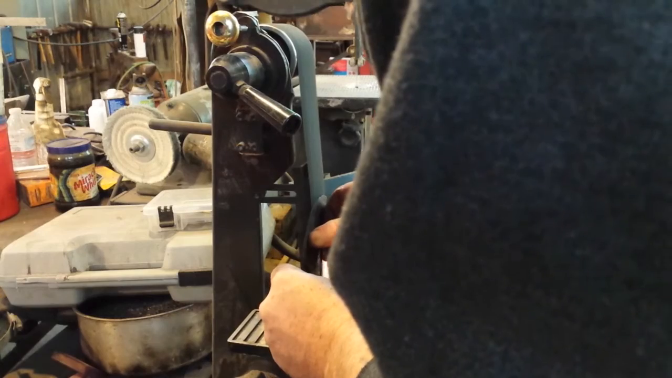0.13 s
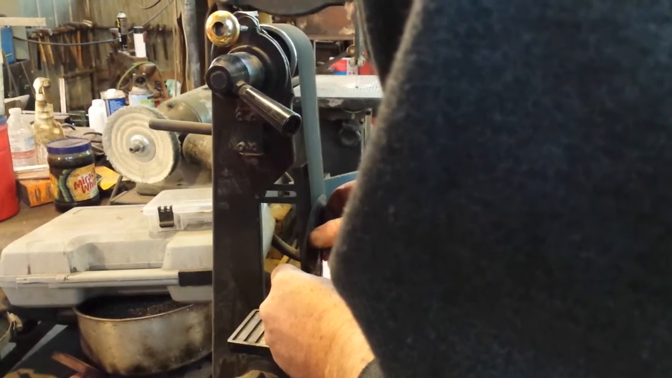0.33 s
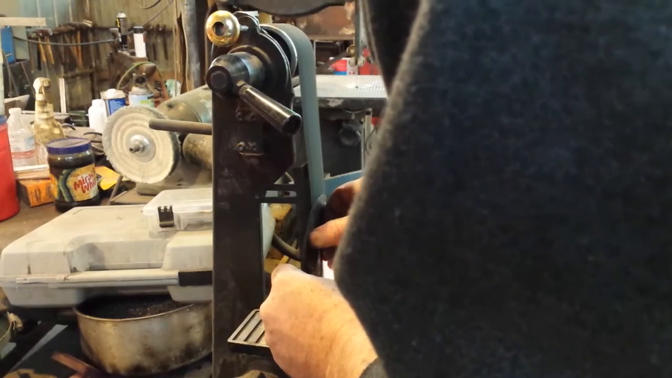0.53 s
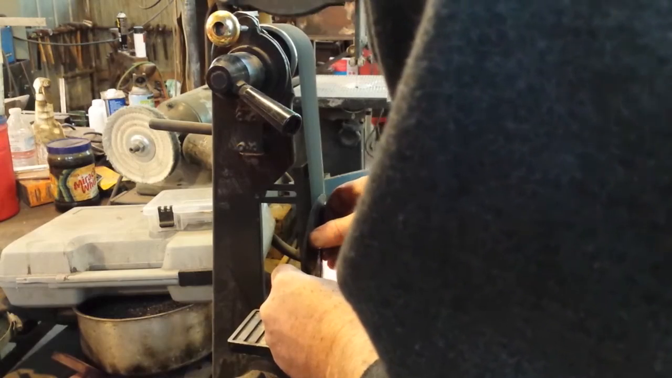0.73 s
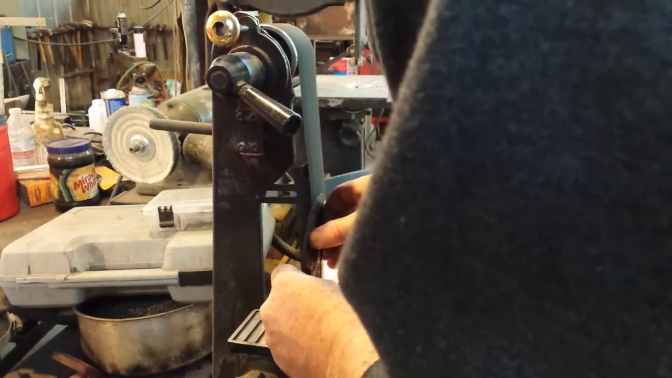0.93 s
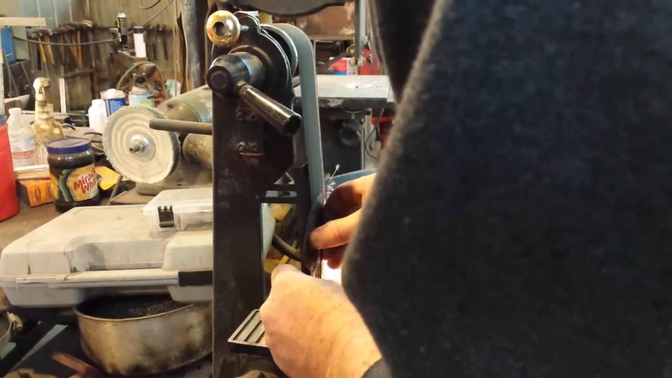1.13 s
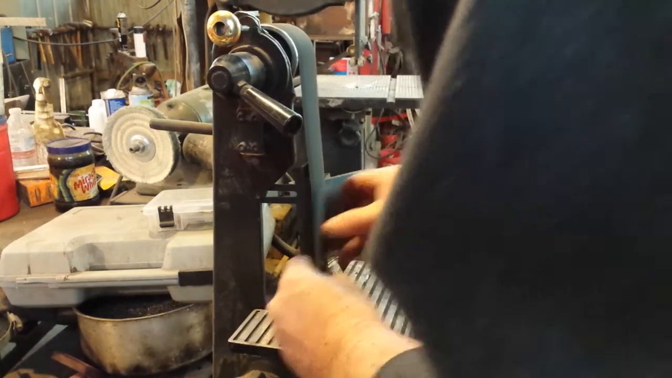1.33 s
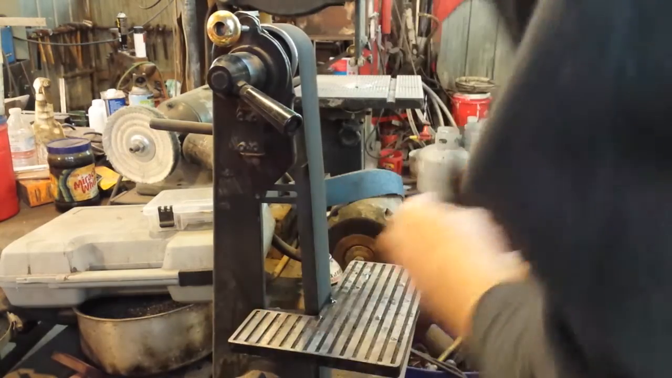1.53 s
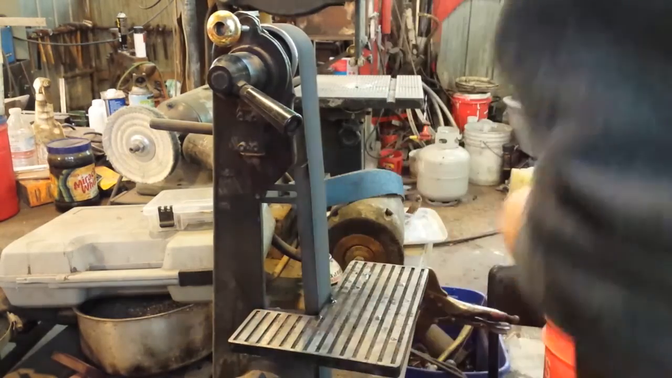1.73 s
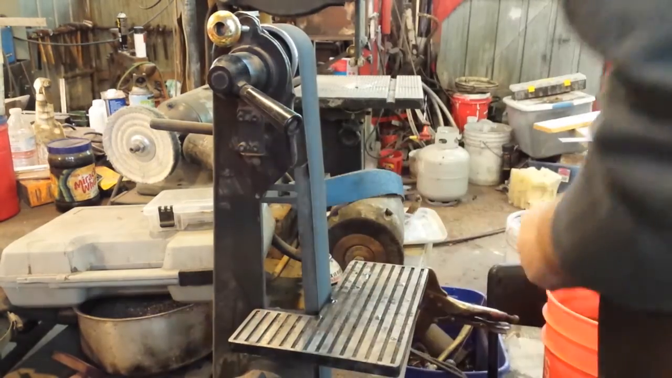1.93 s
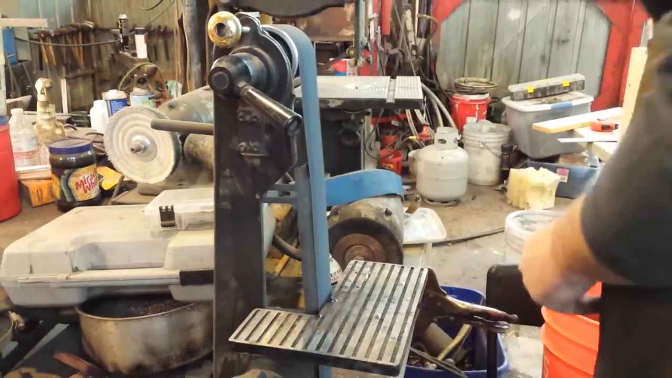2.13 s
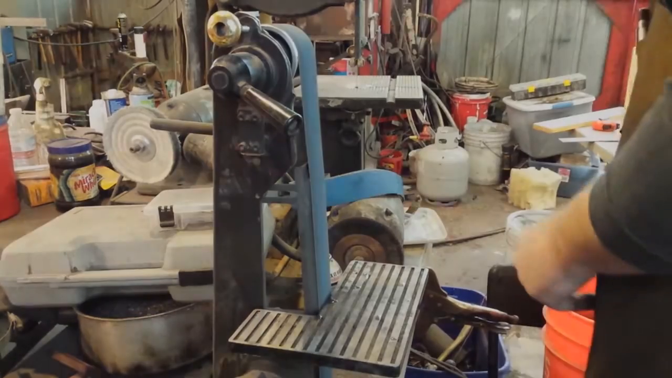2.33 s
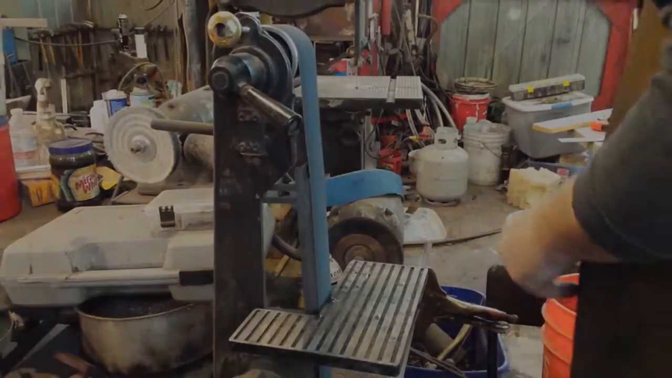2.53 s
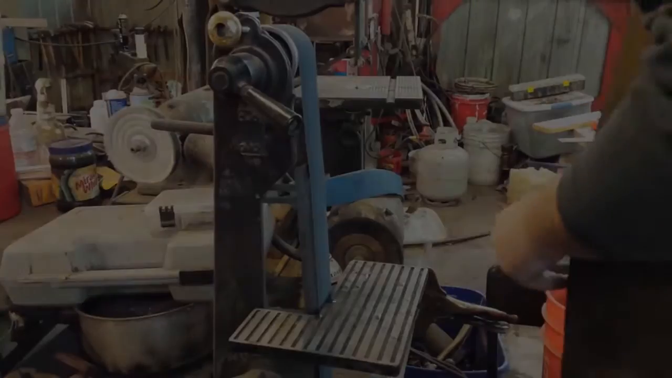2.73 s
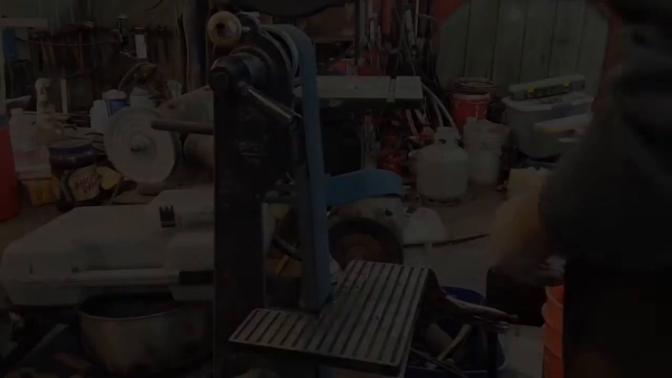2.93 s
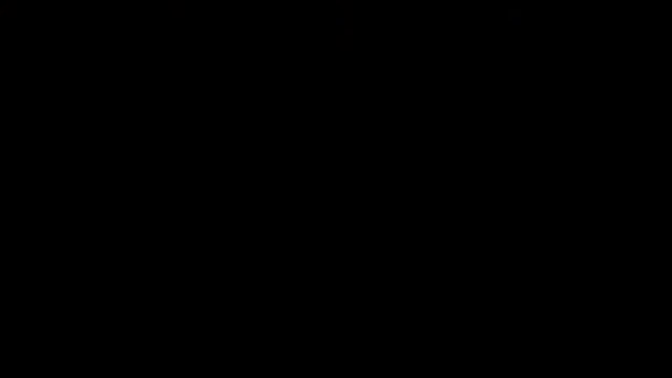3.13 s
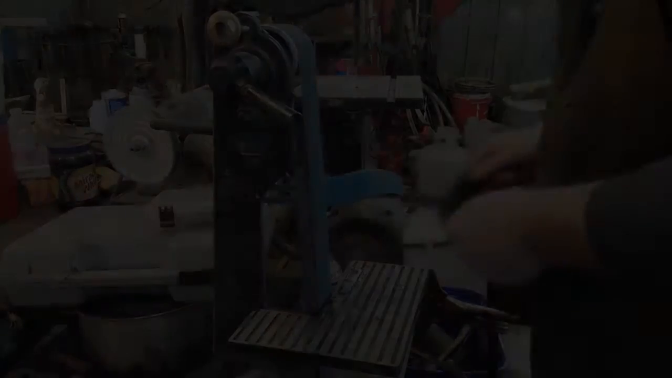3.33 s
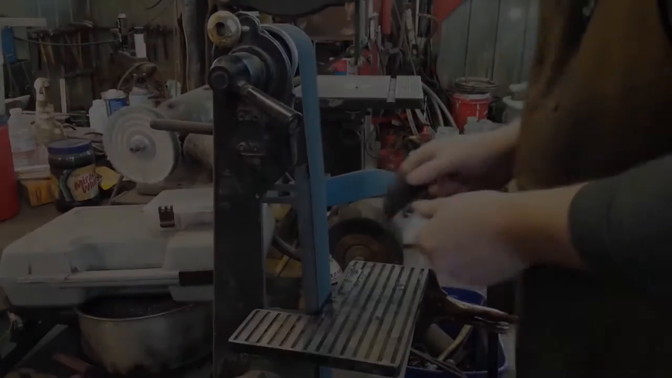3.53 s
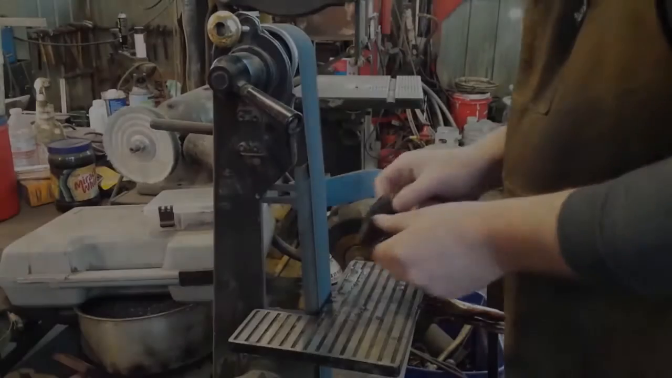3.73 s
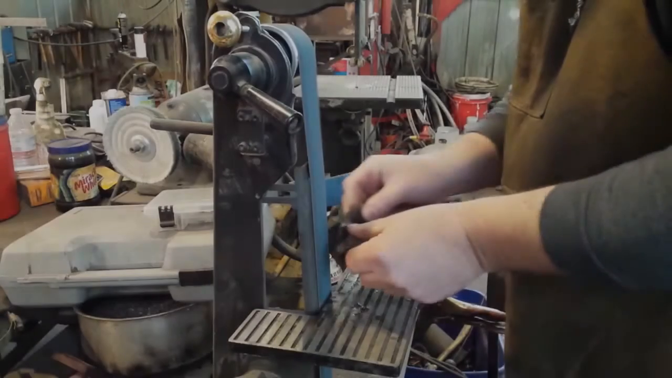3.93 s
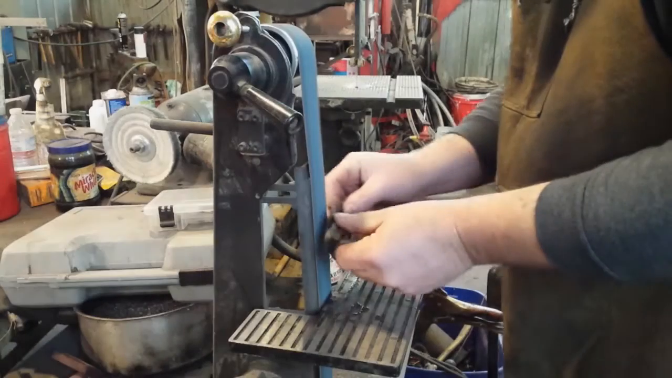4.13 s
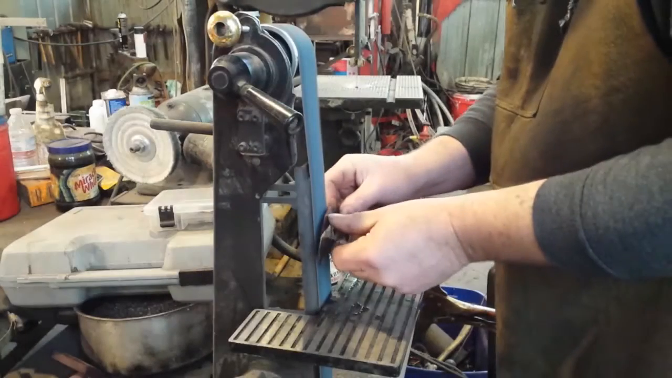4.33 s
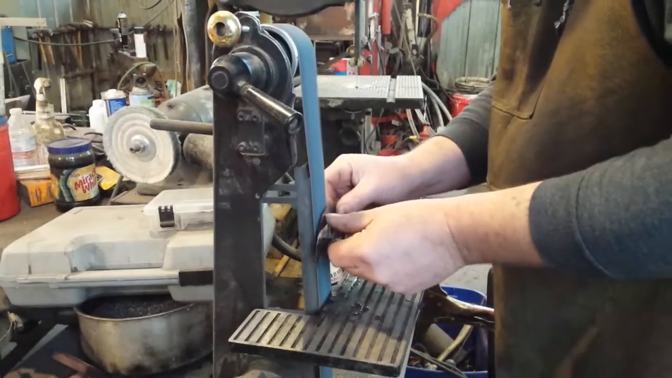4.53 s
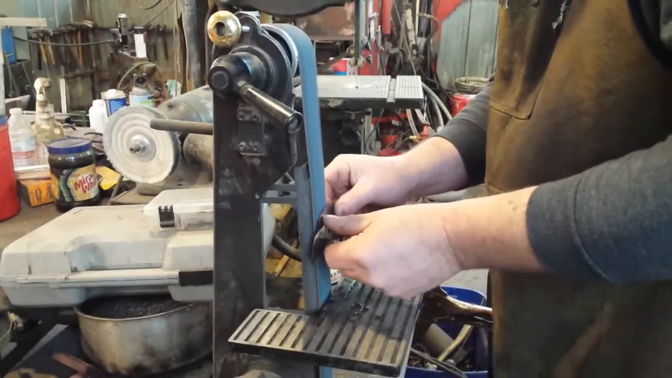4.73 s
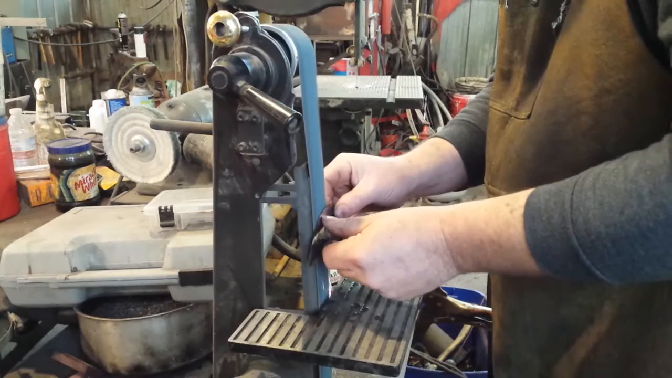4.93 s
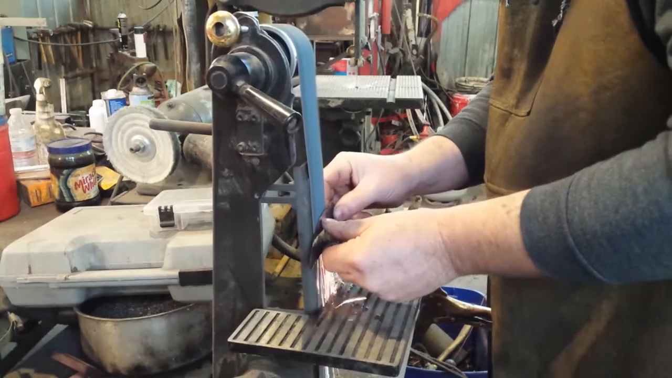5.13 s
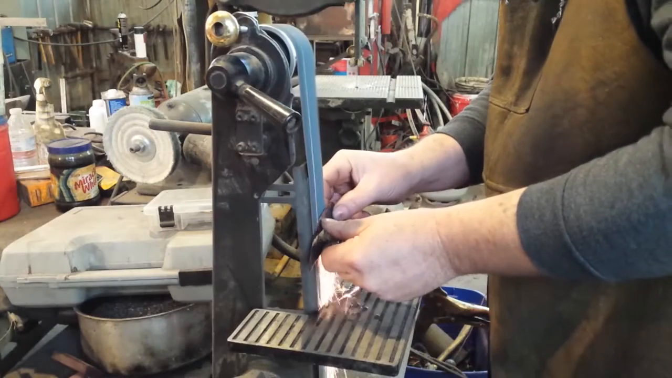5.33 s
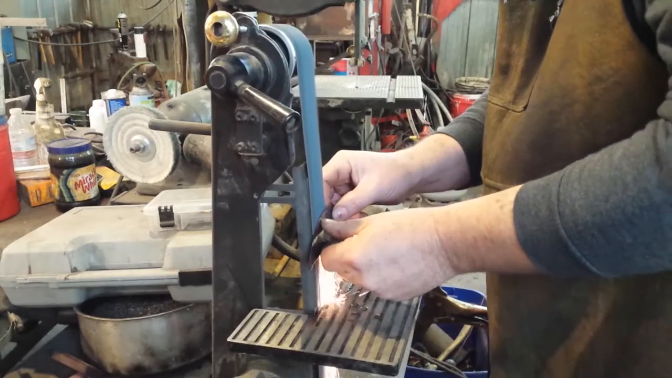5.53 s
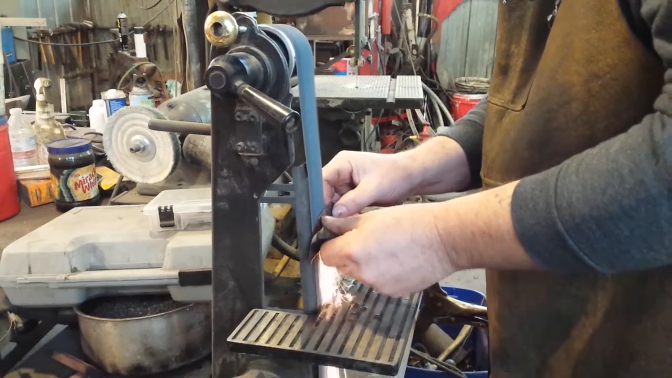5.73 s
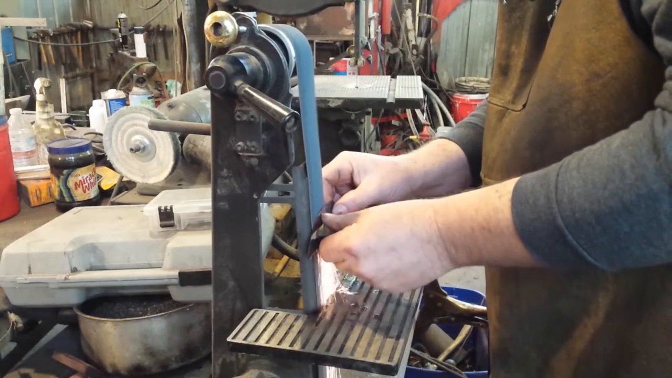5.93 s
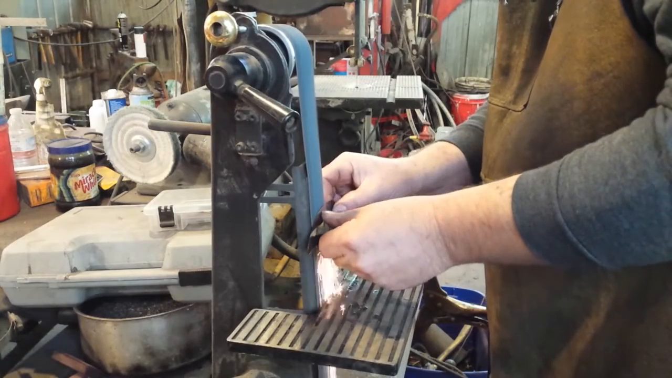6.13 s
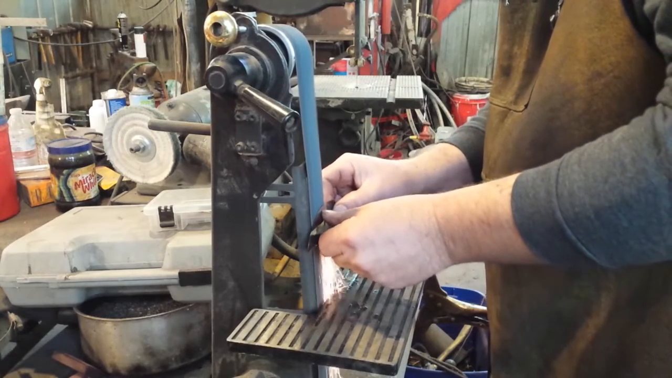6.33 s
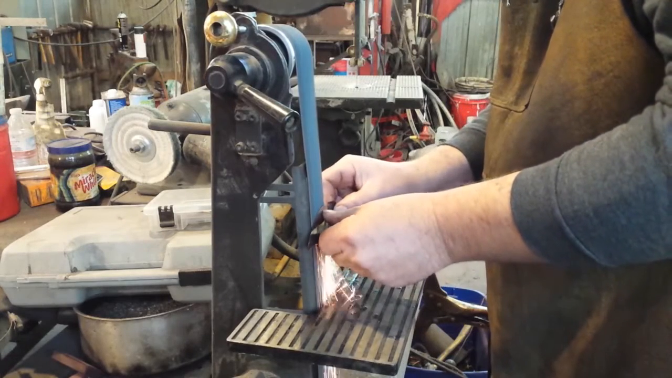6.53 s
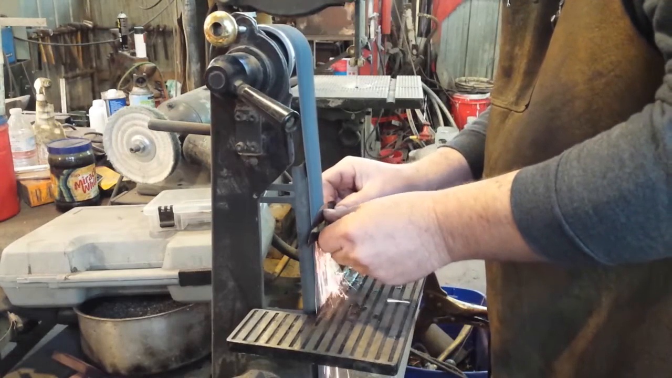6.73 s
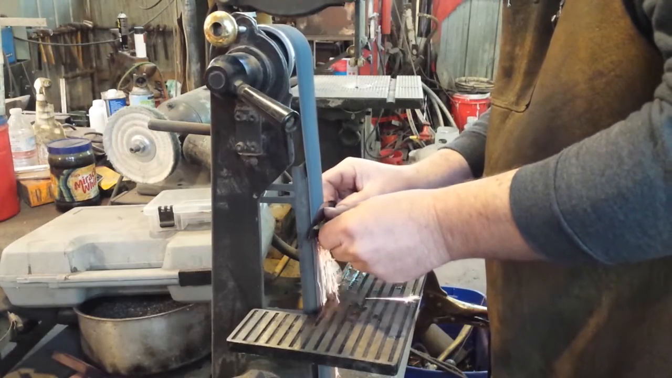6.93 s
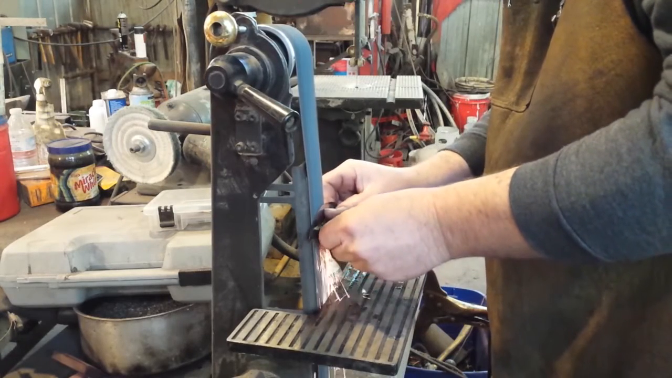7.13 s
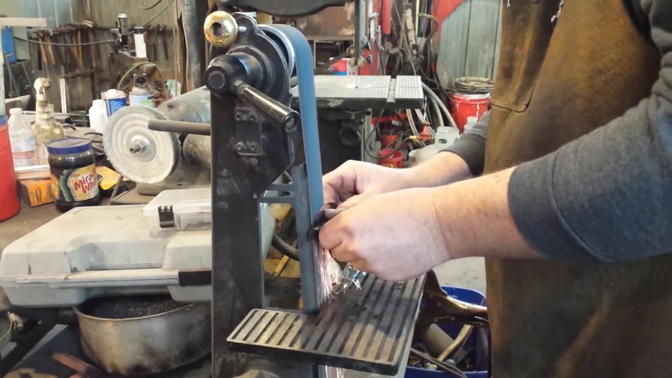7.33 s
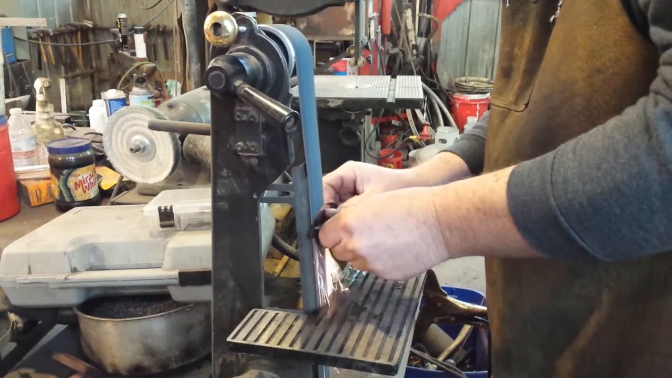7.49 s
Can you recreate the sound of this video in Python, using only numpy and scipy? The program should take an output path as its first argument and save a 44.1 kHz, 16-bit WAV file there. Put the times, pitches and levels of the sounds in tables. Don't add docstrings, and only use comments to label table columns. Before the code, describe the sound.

A harsh metallic grinding hiss stops, leaving a rattling belt whir that dips to silence and returns before steel bites the belt again.

```python
import sys
import numpy as np
from scipy import signal
from scipy.fft import rfft, irfft
from scipy.io import wavfile
from scipy.ndimage import uniform_filter1d, map_coordinates

SR = 44100
rng = np.random.default_rng(int(sys.argv[2]) if len(sys.argv) > 2 else 0)


def gain_from_decibels(decibels):
    exponent = np.asarray(decibels, float) / 20
    return 10 ** exponent


def waveform_to_disk(signal):
    frames = np.transpose(np.atleast_2d(signal))
    scaled = np.clip(frames, -1, 1) * 32767
    samples = np.round(scaled).astype(np.int16)
    wavfile.write(sys.argv[1], SR, samples)


N = 333396
T = np.arange(N) / SR
LIFT_S, TOUCH_S = 1.33, 4.69
FADE_OUT_END_S, FADE_IN_START_S = 3.192, 3.209
FRAME, OVERLAP = 2048, 1536


def evened(x):
    return x / np.sqrt(np.mean(x ** 2) + 1e-20)


def read(points, hz):
    f, value = np.transpose(points)
    return np.interp(np.log(hz + 1), np.log(f + 1), value)


def curve(rows, t, axis=1):
    rows = np.array(rows)
    return np.interp(t, rows[:, 0], rows[:, axis])


def drift(hz):
    steps = rng.standard_normal(size=20000)
    return evened(np.interp(T * 2 * hz, np.arange(len(steps)), steps))


def resonances_db(rows, hz):
    return sum(db / (1 + (2 * (hz - f) / width) ** 2) for f, width, db in rows)


# f/Hz, extra left minus right level/dB
PORT_RING = [(3800, 0), (4850, 4), (5600, 2), (6200, -1), (7100, -7.5), (7900, -3.5), (8500, 5),
             (9400, 7.5), (10500, -0.5)]
# f/Hz, level/dB
RIPPLE = [(1000, 2.2), (4000, 2), (6000, 1), (15000, 1)]
LAG_S, SCATTER_RAD = 1e-4, 1.66


def coloured(pair, gain, balance, same):
    hz, t, z = signal.stft(pair, SR, nperseg=FRAME, noverlap=OVERLAP)
    room = evened(uniform_filter1d(rng.standard_normal((2, len(hz))), size=5, axis=1))[..., None]
    hz = hz[:, None]
    phase = -2 * np.pi * hz * LAG_S + SCATTER_RAD * room[0] * np.clip(hz / 1000, 0, 1)
    like = np.clip(read(same, hz), 0, 1)
    right = z[1]
    left = like * np.exp(1j * phase) * z[1] + np.sqrt(1 - like ** 2) * z[0]
    lean = gain_from_decibels(balance(hz, t) + read(PORT_RING, hz))
    shape = gain(hz, t) * gain_from_decibels(read(RIPPLE, hz) * room[1])
    shape = shape / np.sqrt((1 + lean ** 2) * (shape ** 2).mean(0))
    ports = np.array([left * lean, right]) * 2 * shape
    return signal.istft(ports, SR, nperseg=FRAME, noverlap=OVERLAP)[1][:, :N]


DUCK_FIRST_DB, DUCK_HELD_DB, DUCK_QUICK_DB, DUCK_SECOND_DB = -13.5, -11, -8.5, -13
HOLD_S, RECOVER_DB_PER_S, QUICK_S, SETTLE_S = 0.5, 14, 0.017, 0.5


def automatic_gain_db(t):
    back_s = LIFT_S + HOLD_S - DUCK_HELD_DB / RECOVER_DB_PER_S
    times = [LIFT_S, LIFT_S + QUICK_S, LIFT_S + HOLD_S, back_s, TOUCH_S, TOUCH_S + QUICK_S, TOUCH_S + SETTLE_S]
    levels = [DUCK_FIRST_DB, DUCK_HELD_DB, DUCK_HELD_DB, 0, 0, DUCK_QUICK_DB, DUCK_SECOND_DB]
    return np.interp(t, times, levels)


# t/s, rotation/(turns per s)
WHEEL = [
    (0, 20.6),
    (1.3, 20.6),
    (1.45, 20.87),
    (4.7, 20.87),
    (5.2, 20.2),
    (6.0, 19.95),
    (6.5, 19.87),
    (7.56, 19.87),
]
BELT_HZ, WOBBLE_S = 1.81, 27e-6


def wheel_turns():
    wobble = WHEEL[0][1] * WOBBLE_S * np.sin(2 * np.pi * BELT_HZ * T)
    return np.cumsum(curve(WHEEL, T)) / SR + wobble


RIM_EVEN = 0.48


def rattle(turns):
    size = 2113
    orders = rfft(rng.standard_normal((2, size)))
    rims = evened(irfft(orders / abs(orders) ** RIM_EVEN, size))
    place = [turns % 1 * size]
    return np.array([map_coordinates(rim, place, order=3, mode="grid-wrap") for rim in rims])


# f/Hz, density level/dB per Hz
MACHINE = [(240, -45), (400, -21.5), (526, -22), (630, -20.5), (900, -13), (1150, -16), (1260, -6.5),
           (1370, -12.5), (2030, -12.5), (3610, -8.5), (5600, -5.5), (7030, 3), (7930, -3.5), (9090, -13),
           (13900, -18.5), (15000, -20.5)]
# f/Hz, power share alike each turn
REPEATS = [(500, .35), (1200, .7), (4000, .65), (6000, .85), (8200, .85), (9500, .25), (14000, .1)]
# f/Hz, width/Hz, level/dB
MACHINE_NOTCHES = [(1703, 42, 5), (2060, 103, 3.5), (3000, 84, 3.5), (3450, 320, -3)]
# f/Hz, width/Hz, level/dB
RIDGES = [
    [(6560, 290, 1.5), (7740, 130, 4.5), (8000, 300, -1)],
    [(6850, 310, 1), (7700, 140, 1.5), (8300, 180, 1.5)],
]
# f/Hz, level/dB
WHINE = [
    [(4382, -49), (4883, -49), (5572, -49), (6530, -39.5), (6595, -45), (6718, -42), (6848, -44),
     (6907, -50), (7138, -51), (7219, -52), (7596, -43), (7639, -40.5), (7741, -40), (8140, -52)],
    [(4382, -44), (4883, -45), (5216, -45.5), (5884, -46), (6158, -39), (6616, -41), (6826, -33.5),
     (6971, -37.5), (7052, -34), (7407, -35), (7537, -41), (7639, -34.5), (7763, -41), (7865, -34)],
]
WHINE_DB = [31, 26.5]
# f/Hz, left minus right level/dB
PORTS = [
    [(60, -1), (99, 3.5), (160, -3.5), (270, 2.5), (440, 2), (730, -1.5), (1200, 2), (1980, -2), (3260, 3),
     (5370, -6), (8850, -13), (14600, -22)],
    [(60, 6.0), (99, 5.0), (160, 8), (270, 16), (440, 31), (730, -5), (1200, -5), (1980, -25), (3260, -0.5),
     (5370, -7), (8850, -27), (14600, -65)],
    [(60, 3.0), (99, 8), (160, 14), (270, 16), (440, 25), (730, -7.5), (1200, -4.5), (1980, 3), (3260, 0.5),
     (5370, -8), (8850, -11), (14600, -13.5)],
]
# f/Hz, level/dB
BODY_SHADE = [(9000, -0.5), (12000, -19), (13400, -19), (14600, -17)]
# f/Hz, likeness
SAME = [(60, 0.25), (150, 0.71), (370, 0.69), (940, 0.63), (2340, 0.96), (5840, 0.63), (9000, 0.33),
        (14600, 0.16)]
FREE_DB = -19
LOADED_DB, LOADED_S = 6, 0.5
SHAKE_DB, SHAKE_S = 8.5, 0.34
FRESH_SHARE = .28


def machine(turns):
    def lean(hz, t):
        return read(PORTS[0], hz) + read(BODY_SHADE, hz) * (t < LIFT_S)

    def colour(hz, t):
        ridges_db = np.where(t < FADE_OUT_END_S, resonances_db(RIDGES[0], hz), resonances_db(RIDGES[1], hz))
        return gain_from_decibels(read(MACHINE, hz) + resonances_db(MACHINE_NOTCHES, hz) + ridges_db)

    def alike_colour(hz, t):
        return colour(hz, t) * np.sqrt(read(REPEATS, hz))

    def fresh_colour(hz, t):
        return colour(hz, t) * np.sqrt(1 - read(REPEATS, hz))

    alike = coloured(rattle(turns), alike_colour, lean, SAME)
    fresh = coloured(rng.standard_normal((2, N)), fresh_colour, lean, SAME)
    whine = np.zeros((2, N))
    half = (T > FADE_OUT_END_S).astype(int)
    for (hz, db), (late_hz, late_db) in zip(*WHINE):
        order = np.round(np.array([hz, late_hz]) / WHEEL[2][1])[half]
        tone_db = (np.array([db, late_db]) + WHINE_DB)[half] + 2.0 * drift(hz=3)
        tone = gain_from_decibels(tone_db) * np.sin(2 * np.pi * (order * turns + rng.random()))
        whine += tone * gain_from_decibels([[lean(hz, 0) + read(PORT_RING, hz)], [0]])
    loaded_db = LOADED_DB * np.clip((T - TOUCH_S) / LOADED_S, 0, 1) ** 2
    shake_db = SHAKE_DB * np.exp(-T / SHAKE_S)
    level_db = FREE_DB + automatic_gain_db(T) + loaded_db + shake_db + .5 * drift(hz=12)
    return gain_from_decibels(level_db) * (np.sqrt(1 - FRESH_SHARE) * alike + np.sqrt(FRESH_SHARE) * fresh + whine)


# f/Hz, level/dB
RUMBLE_COLOUR = [(18, -42), (36, -14), (102, -4), (151, -4), (256, -10), (301, -3.5), (368, -9.5),
                 (529, -3), (600, -12.5), (780, -36), (1320, -120)]
# f/Hz, level/dB
TONES = [(70.0, -59.5), (161.5, -45), (204.6, -51.5), (306.8, -48), (419.9, -72), (532.9, -52.5)]
RUMBLE_DB = -38
DEEP_HZ, DEEP_FIRST_DB = 110, -6
THROB_HZ, THROB_AT_S, THROB, THROB_FREE = 5.1, 0.3, 2.9, 0.19
THROB_FROM_S, THROB_SHARP = .27, 1.7
FLUTTER_HZ, FLUTTER = 8.3, 0.6


def rumble():
    def colour(hz, t):
        deep_db = DEEP_FIRST_DB * (t < FADE_OUT_END_S) / (1 + (hz / DEEP_HZ) ** 4)
        return gain_from_decibels(read(RUMBLE_COLOUR, hz) + deep_db)

    noise = coloured(rng.standard_normal((2, N)), colour, lambda hz, t: read(PORTS[0], hz), SAME)
    beat = np.cos(2 * np.pi * THROB_HZ * (T - THROB_AT_S))
    pulses = (T > THROB_FROM_S) * THROB * np.exp(THROB_SHARP * (beat - 1)) - .9
    throb = np.where(T < LIFT_S, pulses, THROB_FREE * beat)
    flutter = FLUTTER * np.cos(2 * np.pi * FLUTTER_HZ * T)
    tones = np.zeros(N)
    for hz, db in TONES:
        swell = 1 + throb * (hz < 200) + flutter * (250 < hz < 350)
        tones += gain_from_decibels(db + 2.0 * drift(hz=6.0)) * swell * np.sin(2 * np.pi * (hz * T + rng.random()))
    return gain_from_decibels(RUMBLE_DB + automatic_gain_db(T)) * evened(noise + 1.01 * evened(tones))


# t/s, half length/s, f/Hz, width/Hz, level/dB
SHIFTS = [(0.38, 0.3, 6550, 500, 5), (1.25, 0.14, 6500, 370, -4.5), (0.29, 0.39, 2050, 290, -7),
          (1.4, .2, 2070, 200, -5), (.05, .1, 9450, 300, -6), (1.11, .07, 9300, 700, 4.5),
          (0.71, .3, 13000, 2500, -2), (4.77, .13, 7950, 530, -6), (6.4, 0.14, 6600, 680, 3),
          (4.98, .1, 1800, 500, 6), (5.14, 0.042, 1900, 200, -2), (5.15, .07, 6500, 800, 3.5),
          (5.85, 0.28, 2240, 47, 5), (6.65, 0.77, 5860, 580, -5), (5.6, 0.41, 6600, 420, 3.5),
          (5.05, 0.18, 8500, 350, -3), (5.16, 0.23, 14000, 340, 5), (6.3, 0.17, 2060, 120, 0),
          (6.7, 0.18, 2240, 100, 3), (6.1, .2, 1600, 410, 2), (5.43, .45, 7940, 240, 4),
          (5.7, 0.54, 7050, 300, -3.5), (5.4, .2, 2062, 70, 4), (5.98, 0.16, 2062, 70, 5),
          (7.2, .5, 5100, 400, -1), (0.43, .5, 4580, 140, 4), (6.1, 0.21, 13300, 1600, 0),
          (1.25, .1, 12000, 1500, -4), (4.2, .15, 3300, 500, -5.5), (.3, .25, 7430, 120, 1),
          (.55, .5, 7050, 350, -4), (.5, .5, 5950, 500, -3), (1.32, .04, 6900, 1200, -6),
          (.45, .35, 7950, 200, 3), (4.93, .08, 1200, 1500, -4)]


def shifts_db(hz, t):
    s, half, f, width, db = np.transpose(SHIFTS)
    stretch = db / (1 + (2 * (hz - f) / width) ** 2)
    moment = np.exp(-((t[:, None] - s) / half) ** 2)
    return stretch @ moment.T


# t/s, pressure level/dB, free ringing level/dB, low ring level/dB
CONTACTS = [
    [(0, -29.5, -6, 19), (.05, -24, -7.5, 13), (.2, -21, -7.5, 0.5), (.3, -21, -4.5, 3),
     (.55, -21.5, -2, 2), (.9, -20.5, 0.5, -2.5), (1.1, -22.5, -0.5, 1), (1.33, -21.5, 3, 0.5)],
    [(4.7, -27, -13, 5), (4.82, -22, -9.5, -3.5), (5.0, -21.5, -1, -9.5), (5.32, -17, -0.8, 1),
     (5.7, -19, -1.1, 2), (6.1, -21, 0.8, 3.5), (6.76, -18, -1.5, -4), (7.05, -19.5, 1.5, -0.7),
     (7.56, -19.5, -2, -0.5)],
]
# t/s, hold index (fractions blend)
GRIP = [(0, -0.5), (2, 0.5), (4, 1), (5.65, 1.5), (5.9, 2.5), (6.15, 2), (6.45, 3), (7.56, 3)]
# f/Hz, density level/dB per Hz
GRIT = [
    [(290, -52), (500, -28.5), (800, -39.5), (922, -17), (2100, -35), (2610, -15), (4110, -16.5),
     (4470, -14), (7680, -1), (8730, -24), (9790, -15.5), (14200, -16.5), (15000, -13.5)],
    [(290, -72), (500, -40), (896, -20), (1080, -27), (1880, -13), (2070, -32), (2570, -26), (2920, -22),
     (4110, -15), (7790, 2), (8860, -28), (14200, -14), (15000, -22)],
    [(290, -70), (500, -30.5), (949, -17), (1910, -23), (2070, -10.5), (2610, -21), (2920, -7.5),
     (4170, -13), (6860, -7), (14000, -15.5), (15000, -11)],
    [(290, -91), (500, -78), (909, -12), (1680, -16), (1910, -27), (2070, -13), (2610, -30), (2960, -10.5),
     (4170, -18), (7260, 0), (8860, -11.5), (14000, -14), (15000, -17)],
]
GRIT_DB = [-0.5, -5.5, -5.5, -3.5]
# f/Hz, width/Hz, level/dB
BLADE_EARLY = [
    [(903, 16, -9), (947, 14, -13), (1023, 13, -11), (4550, 90, -4), (4820, 110, -14), (5460, 43, -3),
     (5940, 40, 2), (6510, 220, 2.5), (7460, 79, 1), (7660, 29, -10), (7900, 450, 3), (9464, 106, 2.5),
     (9940, 180, -9.5), (11630, 220, -6)],
    [(2058, 30, -1), (2140, 25, -11), (2241, 20, -4.5), (2830, 100, -9), (3430, 110, -14), (4800, 38, -17),
     (5740, 91, -22), (6500, 320, 0), (7850, 300, 4), (8800, 39, -12), (9530, 120, -10), (12400, 100, -15),
     (12800, 100, -18), (13920, 130, -11.5)],
]
# f/Hz, width/Hz, level/dB
BLADE_LATE = [
    [(930, 30, -19), (1597, 48, -14), (2064, 29, -0.5), (2250, 14, -5), (2880, 84, -17), (3670, 31, -3.5),
     (5700, 42, -18), (6910, 520, -2), (7700, 120, -5), (7890, 190, 1.5), (9300, 160, -8), (12830, 97, -3),
     (14000, 150, -8.5)],
    [(946, 20, -17), (1750, 140, -16), (2060, 29, -2.5), (2255, 17, -8), (2820, 135, -11), (3670, 40, -4.5),
     (4960, 180, -7.5), (6130, 20, -26), (7240, 600, -1), (9580, 160, -7), (9900, 260, -25),
     (11700, 160, -18), (12750, 87, -12), (14000, 220, -17)],
]
# f/Hz, width/Hz, level/dB
NOTCHES = [(1063, 36, -14), (1340, 59, -10.5), (1550, 27, -6), (2597, 91, -8.5), (2852, 75, -5),
           (3500, 520, 1), (3395, 71, -7.5), (4270, 90, -7), (4280, 100, -10)]
# level/dB, then time constant/s
SPARK_DB = [16, 17]
SPARK_S = [0.13, 0.24]
SPARK_PER_RING, SPARK_REST_DB = 0.74, 1.05


def blade_colour(hz, t):
    grip, power, rows = curve(GRIP, t), 0, CONTACTS[0] + CONTACTS[1]
    ring_db = curve(rows, t, axis=2)
    for k, modes in enumerate(BLADE_EARLY + BLADE_LATE):
        hold = gain_from_decibels(read(GRIT[k], hz) + GRIT_DB[k]) ** 2
        flutter = uniform_filter1d(rng.standard_normal((len(modes), len(t))), size=8, axis=1)
        for (f, width, db), wander in zip(modes, flutter):
            mode_power = gain_from_decibels(db + ring_db + 3.1 * wander) ** 2
            hold = hold + mode_power / (1 + (2 * (hz - f) / width) ** 2) ** 1.96
        power = power + np.clip(1 - abs(grip - k), 0, 1) * hold
    high = 1 / (1 + (8700 / (hz + 1)) ** 8)
    low = 1 / (1 + (hz / 2400) ** 6)
    flare_db = SPARK_DB[0] * np.exp(-t / SPARK_S[0]) + SPARK_DB[1] * np.exp(-abs(t - TOUCH_S) / SPARK_S[1])
    fizz_db = SPARK_REST_DB + SPARK_PER_RING * ring_db + flare_db
    low_ring_db = curve(rows, t, axis=3)
    colour_db = shifts_db(hz, t) + resonances_db(NOTCHES, hz) + high * fizz_db + low * low_ring_db
    return np.sqrt(power) * gain_from_decibels(colour_db)


# t/s of the new bite, level/dB it sank (positive = a snag)
SKIPS = [(.15, -7), (.198, -2), (.434, -1), (0.729, -5), (.875, 1), (.928, -1), (1.204, -1), (4.866, -13),
         (4.955, -2.5), (4.993, -2), (5.055, -5), (5.112, 0), (6.794, 2.5), (7.47, -7)]
SINK_S, BITE_S = 0.0091, 0.0023


def skips_db():
    return sum(db * np.exp(np.where(T < s, (T - s) / SINK_S, (s - T) / BITE_S)) for s, db in SKIPS)


# place/turns, half width/turns, level/dB
SPOTS = [
    [(.16, .04, 4), (.41, .05, 5), (.9, .11, -7)],
    [(.14, .04, 3), (.28, .06, -5), (.7, .1, 3), (.95, .06, -5)],
    [(.3, .14, 3), (.42, .04, 3), (.92, .12, -4)],
]
# lower f/Hz, upper f/Hz
SPOT_BAND_HZ = [
    [7200, 8500],
    [6000, 7100],
    [4200, 5000],
]
# t/s, factor
SPOTTY = [(0, 1), (.9, 1), (1.3, .6), (4.7, .5), (5.1, .8), (5.4, .3), (7.56, .2)]


def spotted(hiss, turns):
    out = hiss
    for band_hz, spots in zip(SPOT_BAND_HZ, SPOTS):
        band = signal.sosfiltfilt(signal.butter(2, band_hz, "band", fs=SR, output="sos"), hiss)
        spots_db = 0
        for place, half, db in spots:
            distance = (turns - place + .5) % 1 - .5
            spots_db = spots_db + db * np.exp(-(distance / half) ** 2)
        out = out + band * (gain_from_decibels(curve(SPOTTY, T) * spots_db) - 1)
    return out


# bumps per turn, level/dB
BUMPS = [(1, .4), (2, -0.4), (3, -0.2), (4, 0.5), (6, .5), (7, 0.5), (8, -1.5), (9, 0.2), (11, -0.3),
         (13, -1.4), (16, 1)]
# t/s, factor
BUMPY = [(0, 0.77), (1.3, 0.73), (4.7, 0.94), (5.2, 0.53), (6, 0.36), (7.56, 0.19)]
# f/Hz, likeness
SAME_BLADE = [(300, 0.56), (1000, 0.37), (2500, 0.51), (5000, 0.32), (9000, 0.84), (14600, 0.2)]
REPEAT_GRIT = 1.1
TRAIL, TRAIL_S = 0.35, .03


def grinding(turns):
    repeated = REPEAT_GRIT * np.sqrt(curve(BUMPY, T)) * rattle(turns)
    grains = (rng.standard_normal((2, N)) + repeated) * gain_from_decibels(1.14 * drift(hz=890))
    hz = np.fft.rfftfreq(FRAME, 1 / SR)[:, None]
    hop = FRAME - OVERLAP
    colour = blade_colour(hz, np.arange(N // hop + 8) * hop / SR)

    def lean(hz, t):
        return np.where(t < 3, read(PORTS[1], hz), read(PORTS[2], hz))

    hiss = coloured(evened(grains), lambda hz, t: colour[:, :len(t)], lean, SAME_BLADE)
    bumps_db = sum(db * np.cos(2 * np.pi * (k * turns + rng.random())) for k, db in BUMPS)
    trail = TRAIL * np.exp(-np.maximum(T - LIFT_S, 0) / TRAIL_S)
    leaving = np.clip((LIFT_S + 0.0067 - T) / 0.018, 0, 1)
    touching = np.maximum(leaving, trail) + np.clip((T - TOUCH_S) / 0.046, 0, 1)
    pressure_db = curve(CONTACTS[0] + CONTACTS[1], T) + skips_db()
    pressure_db = pressure_db + curve(BUMPY, T) * bumps_db + 0.5 * drift(hz=25.2)
    return touching * gain_from_decibels(pressure_db) * spotted(hiss, turns)


# f/Hz, level/dB
SINGING = [
    [(903, -51.5), (947, -48), (1027, -43.5), (1169, -51.5)],
    [(894, -54), (938, -54), (1120, -56), (1173, -50), (1432, -50.5), (1616, -50.5), (1711, -52),
     (2062, -44.5), (2239, -47.5)],
]
SING_FADE_DB_PER_S, SING_FROM_S, SING_RISE_S = 13, 5.13, 0.44


def singing():
    fading = (T < LIFT_S) * gain_from_decibels(-SING_FADE_DB_PER_S * T)
    growing = np.clip((T - SING_FROM_S) / SING_RISE_S, 0, 1)
    out = np.zeros(N)
    for strength, tones in zip((fading, growing), SINGING):
        for hz, db in tones:
            tone = np.sqrt(2) * np.sin(2 * np.pi * hz * T + 0.7 * drift(hz=4))
            out += strength * gain_from_decibels(db + 3.0 * drift(hz=6)) * tone
    return out


# t/s, f/Hz, level/dB, half length/s
THUMPS = [(0.1, 150, -49, 0.029), (5.0, 100, -52, .03), (5.85, 170, -52, .03), (6.55, 170, -52, .03),
          (5.03, 360, -41, 0.012), (5.26, 588, -46, 0.14), (5.155, 121, -53, 0.042),
          (5.272, 99, -51.5, 0.048), (5.397, 120.4, -46, 0.023), (5.456, 350, -44, 0.023),
          (5.583, 190, -43, 0.019), (5.705, 290, -36.5, 0.0063), (5.75, 805, -46.5, 0.38),
          (5.757, 200, -46, 0.023), (5.8, 1300, -41.5, 0.11), (7.5, 250, -54, .025),
          (6.06, 938, -42.5, 0.32), (6.035, 220, -48, 0.017), (6.094, 420, -49.5, 0.32),
          (6.188, 210, -50, 0.027), (6.447, 330, -39, 0.018), (6.517, 270, -46, 0.032),
          (6.727, 190, -46, 0.028), (6.836, 100, -41.5, 0.0137), (5.9, 380, -44, 0.017),
          (6.655, 390, -48.5, .025), (6.735, 480, -46, 0.022), (6.78, 720, -42.5, .015),
          (5.52, 460, -45, .025), (5.55, 310, -50, 0.11), (5.1, 670, -43.5, .06), (7.36, 415, -50, 0.11),
          (7.2, 270, -53, 0.094), (7.22, 595, -55, 0.026), (6.99, 510, -53, 0.027),
          (7.028, 330, -42, 0.014), (7.545, 270, -46, 0.016)]


def thump():
    out = np.zeros(N)
    for s, hz, db, half in THUMPS:
        near = slice(max(int((s - 3 * half) * SR), 0), int((s + 3 * half) * SR))
        envelope = gain_from_decibels(db) * np.exp(-((T[near] - s) / half) ** 2)
        out[near] += envelope * np.sin(2 * np.pi * hz * T[near])
    return out


# f/Hz, width/Hz, level/dB, t60/s
RING_OUT = [
    (5800, 200, -27, .04),
    (7780, 120, -23, .1),
    (9480, 60, -28, 0.27),
]
FLARE_S = 0.045


def ring_out():
    out, near = np.zeros((2, N)), slice(SR, 2 * SR)
    t = T[near] - LIFT_S
    for hz, width, db, t60 in RING_OUT:
        r = np.exp(-np.pi * width / SR)
        noise = rng.standard_normal(SR) + 1j * rng.standard_normal(SR)
        fuzz = signal.lfilter([1 - r], [1, -r], noise)
        mode = evened((fuzz * np.exp(2j * np.pi * hz * t)).real)
        level = np.clip(1 + t / FLARE_S, 0, 1) * gain_from_decibels(db - 60 * np.maximum(t, 0) / t60)
        out[:, near] += level * mode * gain_from_decibels(np.array([[read(PORTS[1], hz)], [0]]))
    return out


def scene():
    turns = wheel_turns()
    return machine(turns) + rumble() + grinding(turns) + singing() + thump() + ring_out()


# f/Hz, level/dB under the whole
GATE = [(60, -52), (150, -46), (300, -46.5), (500, -44.5), (760, -45.5), (900, -50), (1800, -41),
        (2600, -44.5), (3000, -49), (3400, -46), (4100, -43.5), (4700, -49.5), (15000, -61)]
# f/Hz, share of STRICT_DB
STRICT = [(140, 0.91), (190, 0.99), (240, 0.41), (330, -0.1), (480, 0.53), (600, 0.28), (760, .4),
          (850, 0.22), (2300, -0.19), (2600, 0.58), (4400, 0.91)]
# f/Hz, level/dB
LEFT_STRICT = [(2250, 0), (2500, 5), (2750, 5), (2950, 1), (3400, 5), (3800, 3), (4100, 5), (4450, 5),
               (4750, 0)]
STRICT_S, STRICT_RISE_S, STRICT_DB = 4.85, 0.67, 9.5
FIRST_STRICT, MIDDLE_HZ = .6, 2300
GATE_WANDER_DB, EDGE_HZ = 2, 14560


def gated(x):
    hz, t, z = signal.stft(x, SR, nperseg=FRAME, noverlap=OVERLAP)
    power = uniform_filter1d(abs(z) ** 2, size=3, axis=2)
    whole = power.sum(1, keepdims=True)
    whole = np.sqrt(whole * whole.mean(0))
    rows = np.minimum(np.arange(len(hz)) // 4 * 4 + 1, len(hz) - 1)
    columns = np.arange(len(t)) // 2 * 2
    band = uniform_filter1d(power, size=4, axis=1)[:, rows][..., columns]
    wander = uniform_filter1d(rng.standard_normal((len(t), len(hz))), size=3, axis=0)
    wander = evened(uniform_filter1d(wander, size=8, axis=1)).T
    late = np.clip((t - STRICT_S) / STRICT_RISE_S, 0, 1)
    touch = FIRST_STRICT * (t < LIFT_S) + (t > TOUCH_S)
    share = read(STRICT, hz)
    strict_db = STRICT_DB * np.where(hz[:, None] > MIDDLE_HZ, np.outer(share, touch), np.outer(share, late))
    limit_db = GATE_WANDER_DB * wander[rows][:, columns] + read(GATE, hz)[:, None] + strict_db
    limit_db = limit_db + np.multiply.outer([1, 0], read(LEFT_STRICT, hz))[..., None]
    keep = band > whole * gain_from_decibels(limit_db) ** 2
    return signal.istft(z * keep * (hz < EDGE_HZ)[:, None], SR, nperseg=FRAME, noverlap=OVERLAP)[1][:, :N]


# t/s, level/dB
CUT = [
    (3.165, 0),
    (3.17, -17),
    (3.19, -22),
    (3.192, -60),
    (3.208, -60),
    (3.212, -20),
    (3.224, 0),
]
FADE_S = 1.07


def fades():
    ramp = np.maximum(FADE_OUT_END_S - T, T - FADE_IN_START_S) / FADE_S
    return np.clip(ramp, .025, 1) * gain_from_decibels(curve(CUT, T))


def band_limit(x):
    return signal.sosfilt(signal.butter(12, 15180, fs=SR, output="sos"), x)


def record(dry):
    limited = np.tanh(dry / 1.05) * 1.14
    return band_limit(gated(limited) * fades())


dry = scene()
out = record(dry)
waveform_to_disk(out)
```